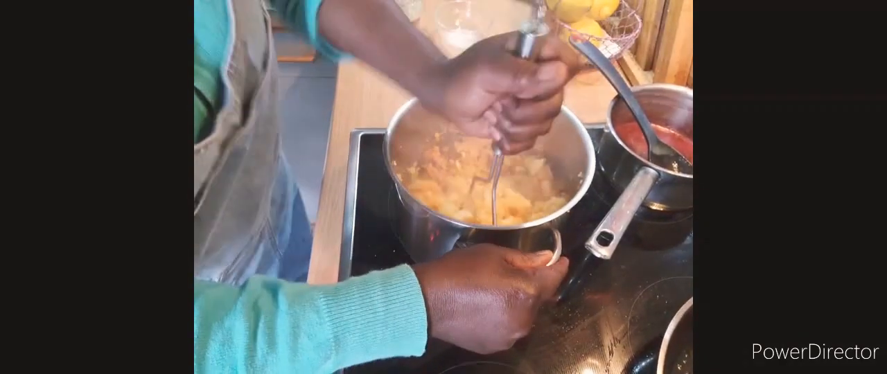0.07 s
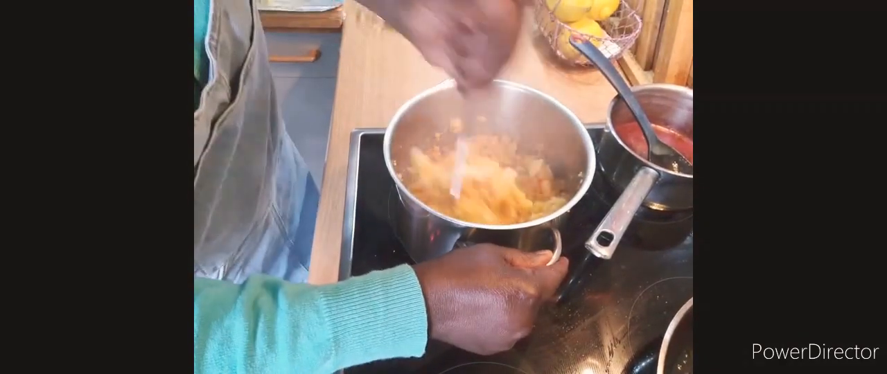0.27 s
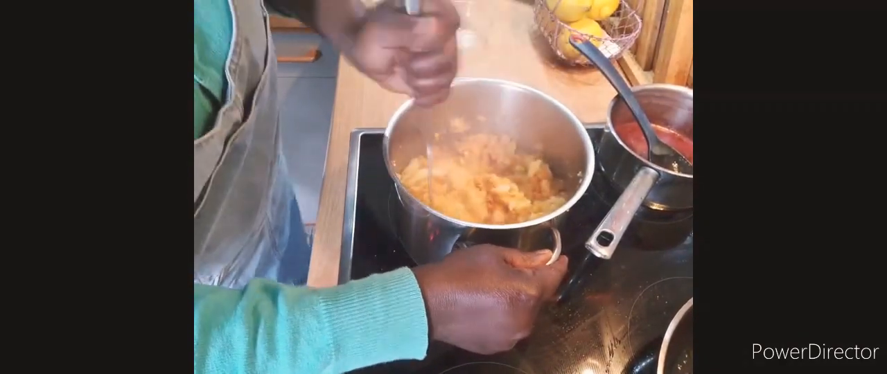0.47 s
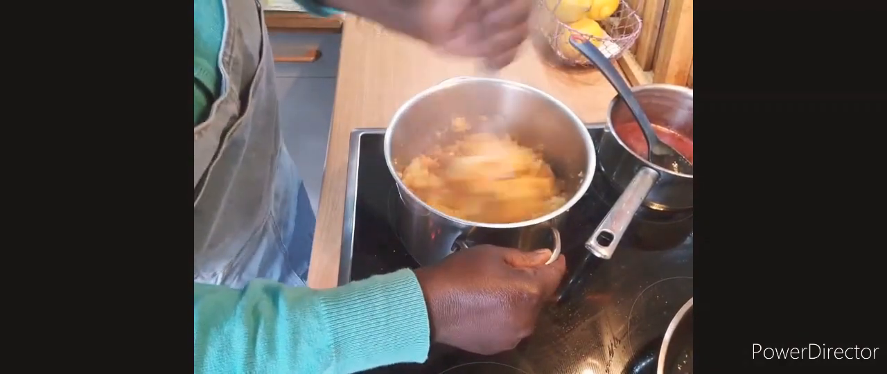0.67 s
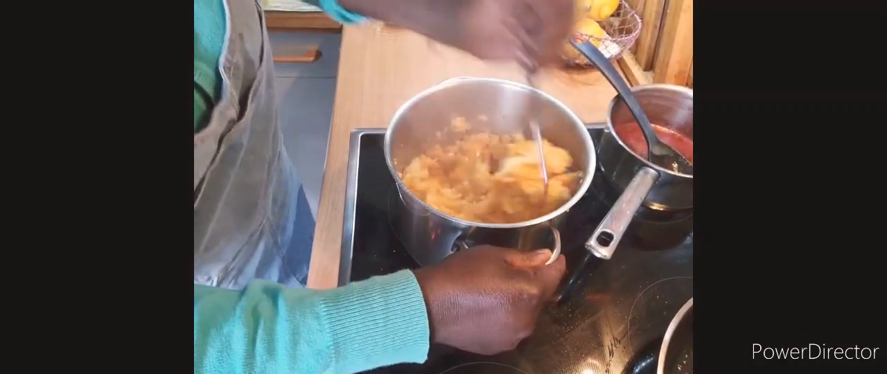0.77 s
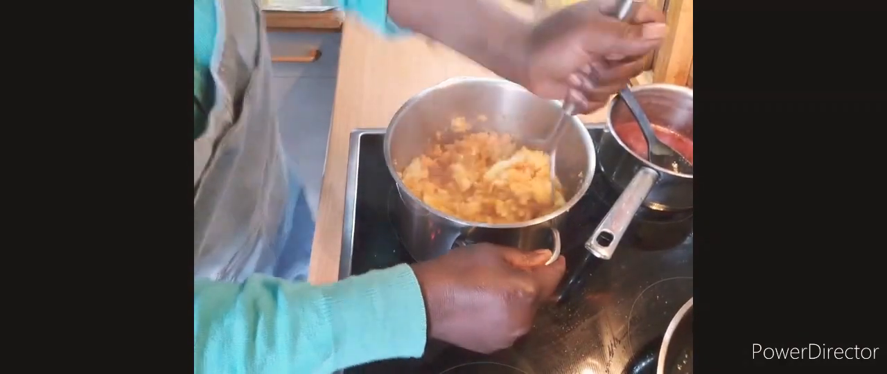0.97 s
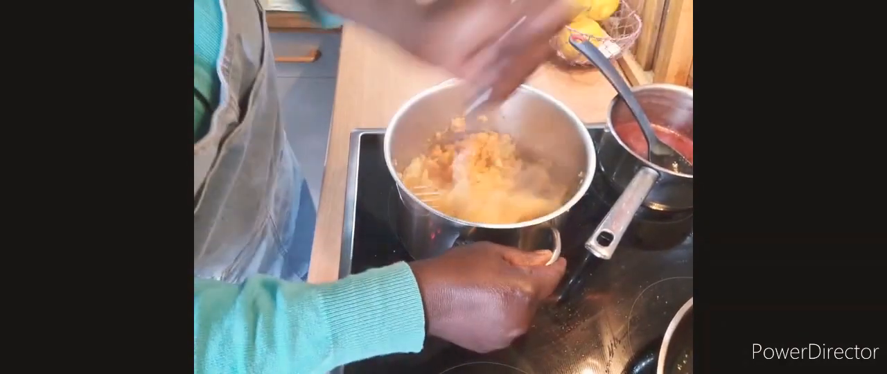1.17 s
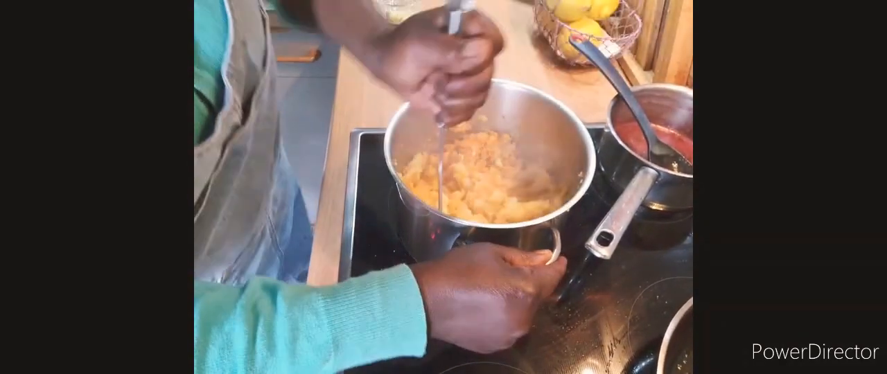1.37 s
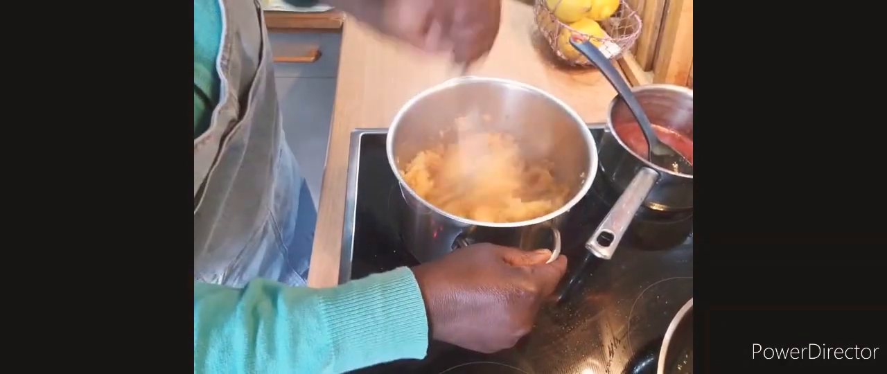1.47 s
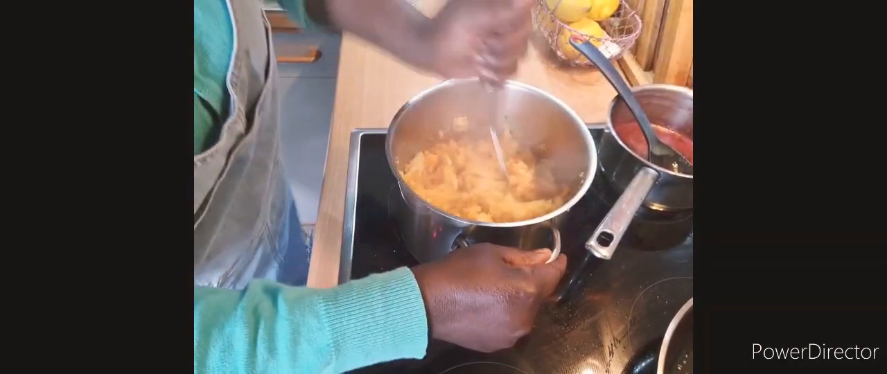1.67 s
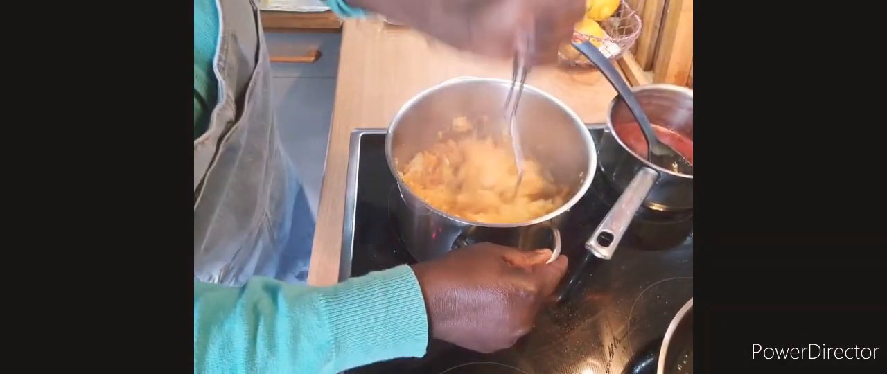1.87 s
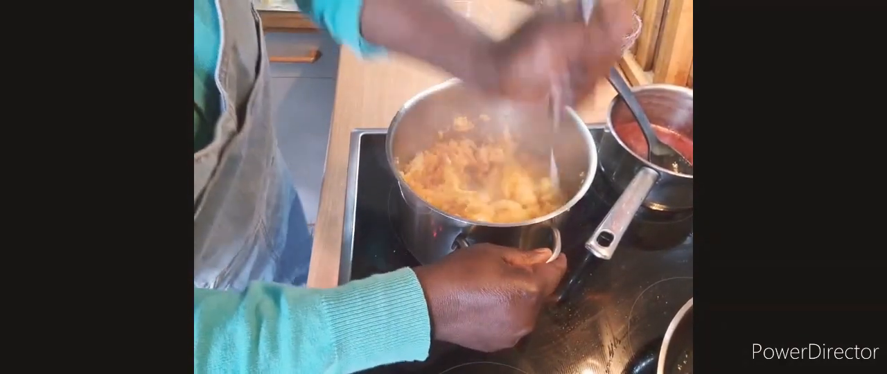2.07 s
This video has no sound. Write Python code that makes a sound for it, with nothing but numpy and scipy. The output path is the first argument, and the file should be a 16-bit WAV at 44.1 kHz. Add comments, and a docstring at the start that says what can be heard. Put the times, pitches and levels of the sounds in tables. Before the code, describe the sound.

A metal masher strikes inside a steel pot, landing on the base near 0.06, 0.5, 0.92, 1.31 and 1.76 seconds; the third is the heaviest thud. Ringing wall clacks and short gritty scrapes come just before the later landings, with another at 2.05. Deep worktop booms follow, strongest at the first. Faint wet squelches and crackles fill gaps, with short room echo, light hiss and low hum.

```python
"""A steel masher works cooked vegetables in a steel pot on a hob, about two and a half strokes a second.
It clacks on the wall as chatter plus ringing modes, then scrapes down as dense stick-slip clicks.
It lands on the base with a bright clack, a thud, and a slow sine boom from the worktop.
Filtered grains make the mash squelch, snap and crackle; gliding partials make one squeak.
A small hard kitchen answers with decaying noise, over a faint noise floor and a steady low hum."""
import sys
import numpy as np
from scipy import signal
from scipy.fft import rfft, irfft
from scipy.io import wavfile

SR = 44100
rng = np.random.default_rng(int(sys.argv[2]) if len(sys.argv) > 2 else 0)


def unload_wav(signal):
    """Save mono or channel-first audio to the path in sys.argv[1] as 16-bit WAV at rate SR, clipped to [-1, 1]."""
    wavfile.write(
        sys.argv[1],
        SR,
        np.round(np.clip(np.atleast_2d(signal).T, -1, 1) * 32767).astype(np.int16),
    )


N = 93888

# masher lands on the base: start_s, clack_db, treble_db, favoured_ring_hz, ring_lift_db,
# thud_db, rumble_db, knock_db, boom_db, boom_rise_s, boom_t60_s
LANDINGS = [(0.0619, -14.5, 4, 3740, 0.5, -25, -29, -36.5, -6, 0.07, 0.43),
            (0.5026, -24, 10.5, 7360, 0.5, -27, -37.5, -47, -16, 0.071, 0.72),
            (.9215, -11, -2.5, 6350, 11.5, -9, -21.5, -22, -8, 0.021, 0.7),
            (1.3142, -26, 11, 4120, 11.5, -30, -38.5, -44.5, -15, .03, 0.42),
            (1.7602, -23, 10, 4270, 13.5, -25.5, -43.5, -51, -21, 0.031, 0.79)]
# modes of the pot wall, damped by the mash: pitch_hz, level_db, t60_s
WALL_MODES = [(624, -6, 0.15), (850, -16.5, 0.15), (1102, -8, 0.049), (1331, -22, 0.069),
              (1680, -11.5, 0.052), (1747, -19, 0.11), (2532, -13.5, 0.15), (2900, -6.5, 0.041),
              (3120, -14, 0.059), (3820, 1, 0.036), (4460, -23, 0.035), (5200, -15, 0.12),
              (5700, -26, 0.043), (7440, -7.5, 0.096)]
# spectrum of the wet mash: frequency_hz, level_db
MASH_SPECTRUM = [(80, -22), (250, -12), (600, 1.5), (1500, 4), (3000, -7), (7500, 0.5), (8700, -11),
                 (13500, -4.5)]


def undb(db):
    """Decibels to gain."""
    return 10 ** (np.asarray(db) / 20)


def unit(x):
    """Scale to rms 1."""
    return x / np.sqrt(np.mean(x ** 2) + 1e-20)


def clock():
    """Time of every sample, in seconds."""
    return np.arange(N) / SR


def add(out, start_s, x):
    """Mix x into out from start_s."""
    i = max(int(start_s * SR), 0)
    out[i:i + len(x)] += x[:max(N - i, 0)]


def convolve(x, response):
    """Pass x through an impulse response, keeping its length."""
    return signal.fftconvolve(x, response)[:len(x)]


def colour(x, spectrum=None, bass_db=0, treble_db=0, ring_hz=1000, lift_db=0):
    """Causal filter: a spectrum at unit power, two shelves and one broad resonance."""
    size = 2048
    f = np.maximum(np.fft.rfftfreq(size, 1 / SR), 1)
    db = np.zeros(len(f))
    if spectrum is not None:
        hz, level_db = np.array(spectrum).T
        db = np.interp(np.log(f), np.log(hz), level_db)
        db = db - 10 * np.log10(np.mean(undb(db) ** 2))
    db = db + bass_db / (1 + (f / 450) ** 2)
    db = db + treble_db / (1 + (6500 / f) ** 4)
    db = db + lift_db * np.exp(-(np.log(f / ring_hz) / .15) ** 2)
    # folding the cepstrum makes the filter minimum phase
    cepstrum = irfft(db * np.log(10) / 20)
    cepstrum[1:size // 2] *= 2
    cepstrum[size // 2 + 1:] = 0
    return convolve(x, irfft(np.exp(rfft(cepstrum))))


def fade(t, t60_s):
    """Exponential decay, 60 dB down after t60_s."""
    return np.exp(-np.log(1000) * t / t60_s)


def walk(rate):
    """Smooth random wander, with rate new targets a second and a spread near 1."""
    return np.interp(clock() * rate, np.arange(N), rng.standard_normal(N))


def grains(rate, spread_db):
    """Tiny clicks at random moments, rate a second on average, a few larger than the rest."""
    size = undb(spread_db * np.minimum(rng.exponential(size=N), 5))
    polarity = rng.choice([-1, 1], N)
    return unit(size * polarity * (rng.random(N) < rate / SR))


def ring(modes):
    """One tap on an object: decaying sines, each randomly detuned a little on every tap."""
    t = clock()[:N // 4]
    out = np.zeros(len(t))
    for k, (hz, level_db, t60_s) in enumerate(modes):
        detune = 1 + 0.0018 * rng.standard_normal()
        tone = np.sin(2 * np.pi * hz * detune * t) * fade(t, t60_s)
        out += (-1) ** k * undb(level_db) * tone
    return out


def clack(modes, ring_db, spectrum, chatter_s):
    """Steel on steel: a few milliseconds of dense chatter and the ring of the struck part."""
    chatter_shape, crack_db, contact_s = 1.41, 2.5, 0.00063
    t = clock()[:N // 4]
    burst = rng.choice([-1., 1.], len(t)) * np.exp(-(t / chatter_s) ** chatter_shape)
    chatter = colour(burst, spectrum)
    onset = 1 - np.exp(-t / contact_s)
    return (undb(crack_db) * chatter + undb(ring_db) * ring(modes)) * onset


def wall_strikes():
    """The masher's edge hits the wall; each spot favours other modes."""
    # hits: start_s, level_db, bass_db, treble_db, favoured_ring_hz, ring_lift_db, chatter_s
    strikes = [(.448, -15, -0.5, 5.5, 1137, 13, 0.0068), (0.4521, -18, -0.5, -6, 1140, 19.5, 0.0084),
               (.845, -18, -8, -6.5, 1064, 10.5, 0.0081), (1.2173, -13.5, -18, 6.5, 3080, 7.5, 0.0043),
               (1.247, -18, -2.5, -0.5, 1026, 12, 0.0084), (1.6085, -19.5, -11.5, 8.5, 2830, 11.5, 0.0073),
               (1.623, -32.5, 23.5, 21, 1930, 19, 0.0043), (2.0453, -14.5, -7, 2.5, 1368, 17, 0.007),
               (0.4786, -32.5, -5, -16, 1115, 11.5, 0.0063)]
    # contact spectrum: frequency_hz, level_db
    clack_spectrum = [(60, -19), (200, -10), (600, 1.5), (1500, -8.5), (3000, -5.5), (5500, -3.5),
                      (7500, -1), (8700, -14.5), (13500, -13.5)]
    out = np.zeros(N)
    for start_s, level_db, bass_db, treble_db, ring_hz, lift_db, chatter_s in strikes:
        hit = clack(WALL_MODES, -1.5, clack_spectrum, chatter_s)
        hit = colour(hit, None, bass_db, treble_db, ring_hz, lift_db)
        add(out, start_s, undb(level_db) * hit)
    return out


def closing_gap(x, length_s):
    """The echo between plate and mash comes ever sooner, so its resonances slide."""
    t = clock()
    gap_m = np.interp(t, [0, length_s], [.16, .06])
    delay_s = 2 * gap_m / 343  # there and back at the speed of sound, m/s
    return x + .5 * np.interp(t - delay_s, t, x)


def scrapes():
    """Dense stick-slip clicks ring the wall while the masher judders down it."""
    # downward scrapes: start_s, length_s, level_db, fade_db, bass_db, favoured_ring_hz, ring_lift_db
    strokes = [(0, 0.063, -41.5, -2, 15.5, 1720, 15.5), (.458, 0.048, -29, -7, -2, 1130, 18),
               (.852, 0.0855, -37.5, -4, 16.5, 916, 21), (1.221, 0.089, -21, -10.5, 3, 2900, -0.5),
               (1.614, 0.151, -26, -11, -23, 3010, 2.5), (2.049, 0.07, -26, -10.5, 9.5, 795, 15)]
    # friction spectrum: frequency_hz, level_db
    scrape_spectrum = [(40, -22), (130, 2), (250, -12.5), (600, -2), (1500, -8), (3000, 0.5), (5500, -6.5),
                       (7400, -1), (8700, -12.5), (13500, -13)]
    slips_per_s, spread_db = 3500, 1.5
    judder_per_s, judder_db, ring_db = 129, 3, -6
    out, t = np.zeros(N), clock()
    for start_s, length_s, level_db, fade_db, bass_db, ring_hz, lift_db in strokes:
        judder = undb(judder_db * walk(judder_per_s))
        slips = unit(grains(slips_per_s, spread_db) * judder)
        wall = unit(convolve(slips, ring(WALL_MODES)))
        sound = closing_gap(colour(slips, scrape_spectrum) + undb(ring_db) * wall, length_s)
        sound = unit(colour(sound, None, bass_db, 0, ring_hz, lift_db))
        attack = np.clip(t / 0.0017, 0, 1)
        release = np.clip((length_s - t) / 0.021 + .5, 0, 1)  # centred on the end of the stroke
        pressure = attack * release * undb(fade_db * np.minimum(t / length_s, 1))
        add(out, start_s, undb(level_db) * pressure * sound)
    return out


def thud():
    """The dull push of the pot on the hob, a short low sine."""
    thud_hz, t60_s, onset_s = 124.6, 0.069, 0.00085
    t = clock()[:N // 4]
    return -np.sin(2 * np.pi * thud_hz * t) * fade(t, t60_s) * (1 - np.exp(-t / onset_s))


def rumble(t60_s):
    """Dark low noise that swells at once and dies away, like many crowded low modes."""
    # spectrum: frequency_hz, level_db
    rumble_spectrum = [(40, -28.5), (80, 4), (150, 0), (220, -6), (400, -12.5), (900, -21), (3000, -31.5),
                       (13500, -73.5)]
    t = clock()
    noise = unit(colour(rng.standard_normal(N), rumble_spectrum))
    return noise * fade(t, t60_s) * (1 - np.exp(-t / 0.00067))


def landings():
    """The masher meets the base: a bright clack, then a thud, knock and rumble through the hob."""
    # modes of the base with the masher pressed on it: pitch_hz, level_db, t60_s
    base_modes = [(1650, -14, .06), (2370, -17, .07), (2700, -11, .06), (3680, -13, .04), (3950, -13, .05),
                  (5270, -15, .05), (5620, -14, .05), (6500, -13, .06), (6850, -14, .08), (7020, -12, .08),
                  (7470, -13, .08), (7650, -16, .07)]
    # modes of the hob under the pot: pitch_hz, level_db, t60_s
    hob_modes = [(98, -5, .2), (148, -4, .25), (178, -3, .12), (210, -1, .12), (292, -6, .16),
                 (329, -1, .2), (390, -9, .12), (457, -7, .16), (515, -9, .1), (655, -12, .13),
                 (732, -12, .13), (855, -11, .12)]
    # contact spectrum: frequency_hz, level_db
    landing_spectrum = [(60, 28), (300, -6.5), (900, -5), (2000, 0), (3700, 3), (5500, -3), (7400, 1.5),
                        (8700, -5), (13500, -5.5)]
    chatter_s, ring_db, rumble_t60_s = 0.0092, -4, .36
    out = np.zeros(N)
    for (start_s, clack_db, treble_db, ring_hz, lift_db,
         thud_db, rumble_db, knock_db, *_) in LANDINGS:
        bright = clack(base_modes, ring_db, landing_spectrum, chatter_s)
        bright = colour(bright, None, 0, treble_db, ring_hz, lift_db)
        body = undb(thud_db) * thud() + undb(knock_db) * ring(hob_modes)
        add(out, start_s, undb(clack_db) * bright + body)
        add(out, start_s, undb(rumble_db) * rumble(rumble_t60_s))
    return out


def worktop():
    """Each landing sets the worktop swinging in its lowest mode."""
    boom_hz = 49.5
    out, t = np.zeros(N), clock()
    for start_s, *_, boom_db, rise_s, t60_s in LANDINGS:
        swell = (1 - np.exp(-t / rise_s)) * fade(t, t60_s)
        add(out, start_s, undb(boom_db) * np.sin(2 * np.pi * boom_hz * t) * swell)
    return out


def low_rumbles():
    """Short dark low rumbles, swelling at once and dying away."""
    # rumbles: start_s, level_db
    rumbles = [(0.62, -41), (1.612, -28), (1.4, -41), (1.9, -47), (1, -40), (.452, -38.5)]
    out = np.zeros(N)
    for start_s, level_db in rumbles:
        add(out, start_s, undb(level_db) * rumble(0.19))
    return out


def squelches():
    """Wet films burst in small hollows as the mash sucks and tears: dense grains, one resonance."""
    # squelches: start_s, length_s, level_db, hollow_hz, hollow_lift_db, bass_db, treble_db
    bursts = [(0.036, .008, -34.5, 1570, 14, 0, -16), (0.205, 0.028, -42, 1210, 7, 4, -12),
              (0.217, 0.061, -42.5, 687, 7.5, 7.5, -4), (0.612, 0.083, -47, 1230, -8, -2, -8),
              (0.756, 0.016, -47.5, 2530, 14, 6, -20), (1.053, 0.032, -38, 1470, 11, -8, -17),
              (1.456, 0.028, -43.5, 2060, 5.5, -9, -5), (1.875, .016, -39.5, 2310, 14.5, -15, -0.5),
              (1.899, 0.039, -53.5, 1200, 7, -15, 1), (0.911, 0.012, -33, 2100, 8, -2, -22)]
    out, t = np.zeros(N), clock()
    for start_s, length_s, level_db, hollow_hz, lift_db, bass_db, treble_db in bursts:
        films = grains(1750, spread_db=0.5)
        wet = unit(colour(films, MASH_SPECTRUM, bass_db, treble_db, hollow_hz, lift_db))
        swell = np.sin(np.pi * np.minimum(t / length_s, 1))
        add(out, start_s, undb(level_db) * wet * swell)
    return out


def snaps():
    """Small wet snaps of the mash: noise bursts with a one-millisecond decay constant."""
    # snaps: start_s, level_db
    wet_snaps = [(.613, -52), (.665, -42), (.685, -39.5), (1.854, -40)]
    out, t = np.zeros(N), clock()
    for start_s, level_db in wet_snaps:
        burst = rng.standard_normal(N) * np.exp(-t / 0.001)
        add(out, start_s, undb(level_db) * colour(burst, MASH_SPECTRUM, bass_db=-4, treble_db=6.5))
    return out


def squeak():
    """Wet steel sticks and slips as the masher is lifted and sets a few modes singing."""
    # singing modes: pitch_hz, level_db, glide_hz_per_s
    partials = [(1150, 0, -1500), (1730, -3, 0), (2390, -3, 1000), (3240, -3, 6000), (5490, -7, 1500)]
    start_s, length_s, level_db = .757, .048, -56
    jitter, jitter_per_s = .022, 900  # jitter is a fraction of the pitch
    out, t = np.zeros(N), clock()
    tone = np.zeros(N)
    for hz, partial_db, glide in partials:
        pitch_hz = (hz + glide * np.minimum(t, length_s)) * (1 + jitter * walk(jitter_per_s))
        tone += undb(partial_db) * np.sin(2 * np.pi * np.cumsum(pitch_hz) / SR)
    envelope = np.clip(np.minimum(t, length_s - t) / .004, 0, 1)
    add(out, start_s, undb(level_db) * unit(tone) * envelope)
    return out


def crackle():
    """The mash keeps up a faint crackle of sparse grains."""
    pops = grains(340, spread_db=4)
    return undb(-67.5) * colour(pops, MASH_SPECTRUM, bass_db=-10.5)


def kitchen(x):
    """Diffuse reflections of a small hard room: noise bands, each with its own decay."""
    # reverb bands: centre_hz, t60_s, level_db
    bands = [(99, 0.39, -15.5), (432, 0.31, -6), (1137, 0.38, -9), (3500, 0.42, -10), (6900, 0.46, -14),
             (13000, 0.3, -12.5)]
    gap_s = 0.0068  # silence before the first reflections
    hz, t60_s, level_db = np.array(bands).T
    t = clock()
    f = np.maximum(np.fft.rfftfreq(N, 1 / SR), 1)
    noise = rfft(rng.standard_normal(N))
    tail = np.zeros(N)
    for k, share in enumerate(np.eye(len(hz))):
        band = irfft(noise * np.interp(np.log(f), np.log(hz), share), N)
        envelope = fade(t, t60_s[k]) * np.clip(t / gap_s - 1, 0, 1)
        tail += undb(level_db[k]) * band * envelope / np.sqrt(np.sum(envelope ** 2))
    return convolve(x, tail)


def noise_floor():
    """Steady filtered noise with a faint steady low hum, a single sine near 50 Hz."""
    # spectrum: frequency_hz, level_db
    floor_spectrum = [(25, 14), (50, 12), (100, 13.5), (300, -11), (1100, -13), (2500, -24), (7000, -13),
                      (9000, -15), (13500, -11)]
    hum_hz, hum_db = 50.29, -46.5
    noise = undb(-57) * colour(rng.standard_normal(N), floor_spectrum)
    return noise + undb(hum_db) * np.sin(2 * np.pi * hum_hz * clock())


def scene():
    """Pot and mash with their room, over the worktop boom and the noise floor."""
    steel = wall_strikes() + scrapes() + landings() + squeak()
    mash = squelches() + snaps() + crackle()
    pot = steel + low_rumbles() + mash
    return (pot + kitchen(pot) + worktop() + noise_floor())[None]


def record(dry):
    """Thin the deepest bass with a gentle high-pass and cut the top with a steep low-pass."""
    low_cut_hz, top_hz = 30.5, 13850
    high_pass = signal.butter(2, low_cut_hz, "high", fs=SR, output="sos")
    low_pass = signal.ellip(10, .2, 70, top_hz, fs=SR, output="sos")
    return signal.sosfilt(low_pass, signal.sosfilt(high_pass, dry))


dry = scene()
out = record(dry)
unload_wav(out)
```